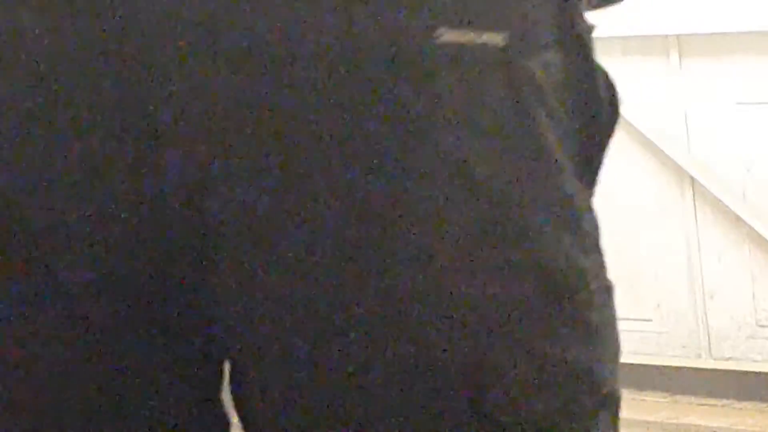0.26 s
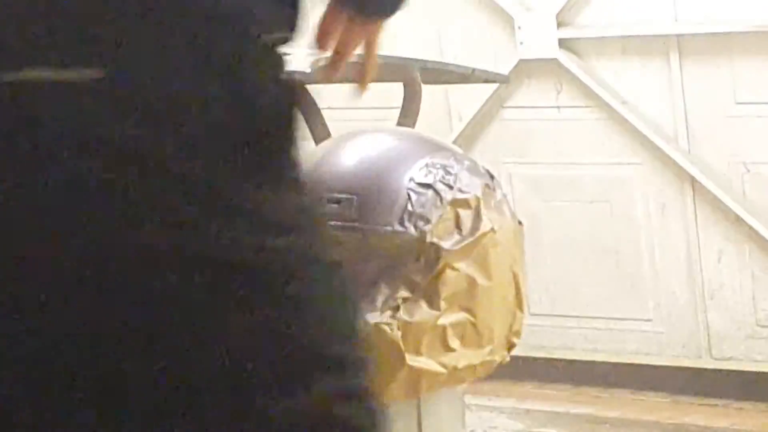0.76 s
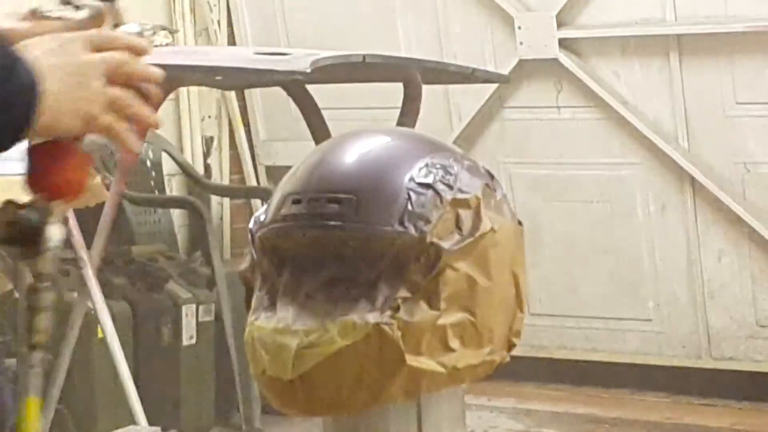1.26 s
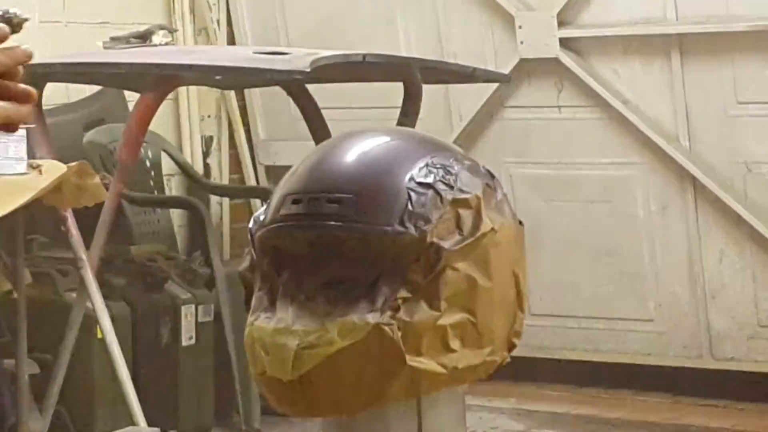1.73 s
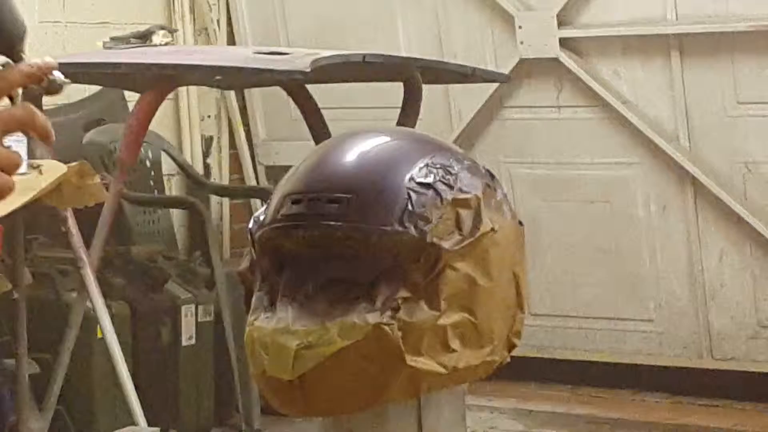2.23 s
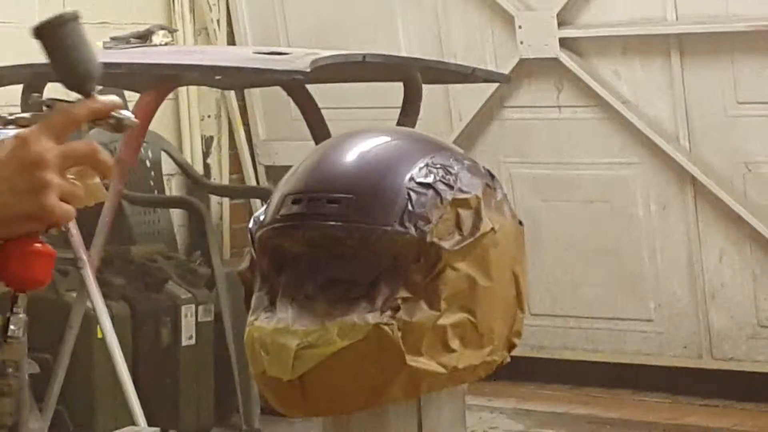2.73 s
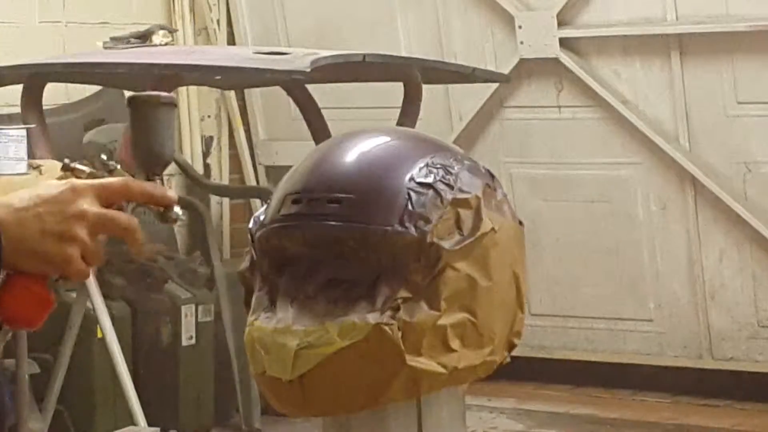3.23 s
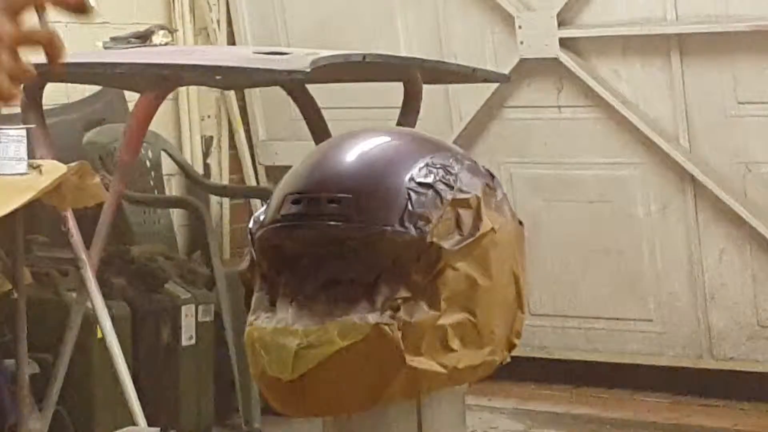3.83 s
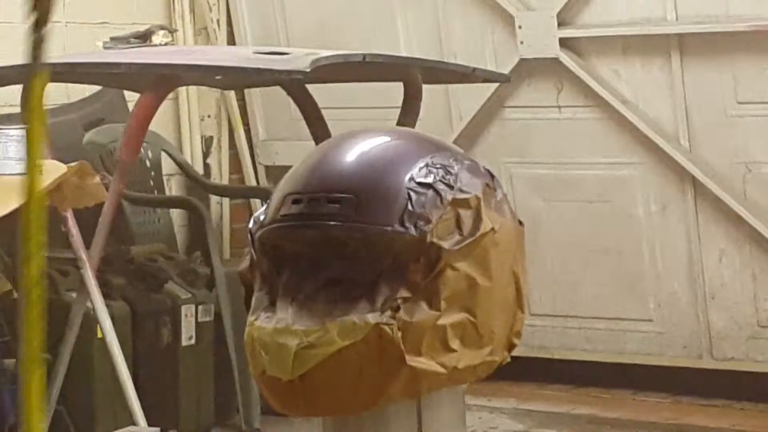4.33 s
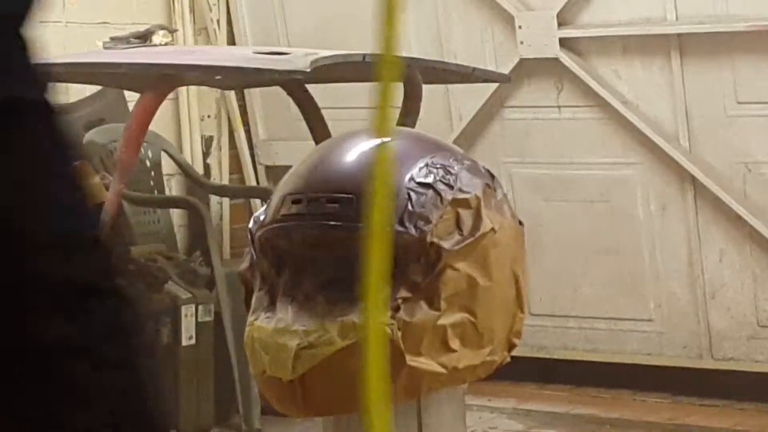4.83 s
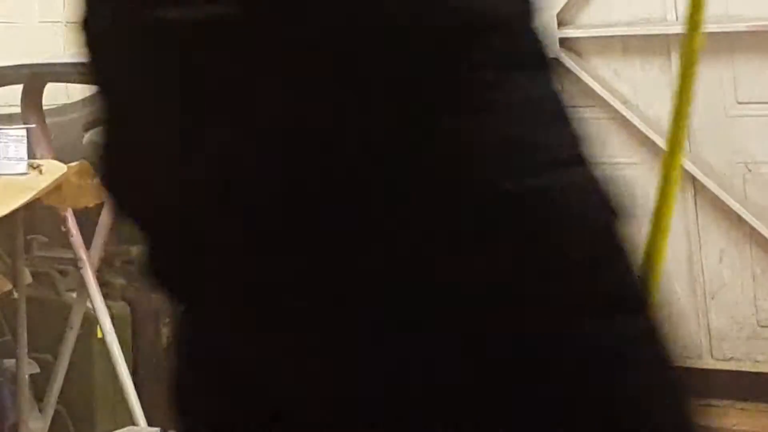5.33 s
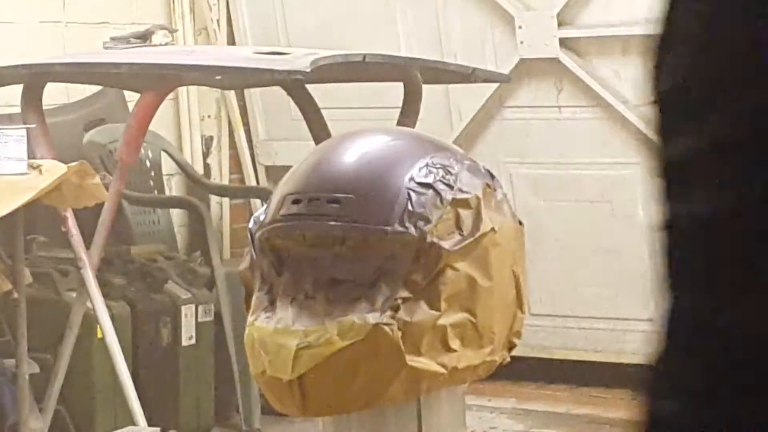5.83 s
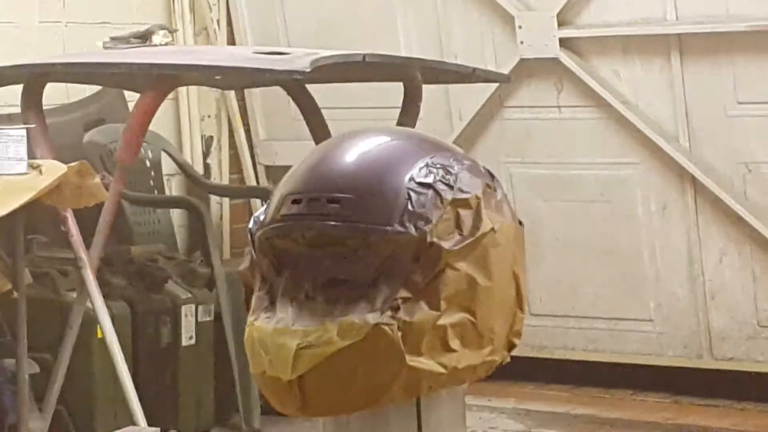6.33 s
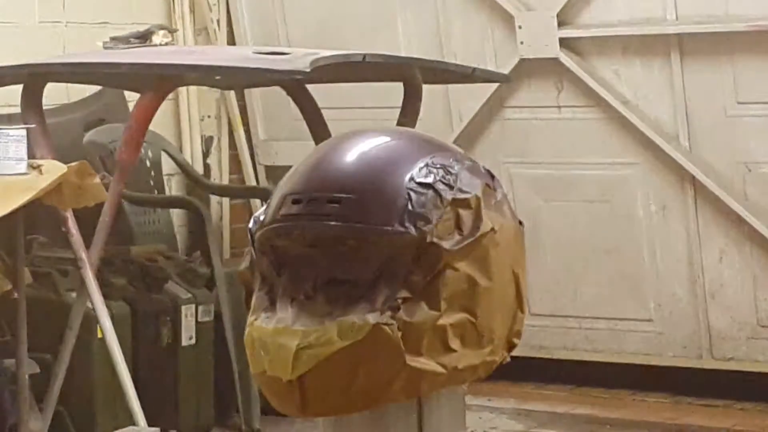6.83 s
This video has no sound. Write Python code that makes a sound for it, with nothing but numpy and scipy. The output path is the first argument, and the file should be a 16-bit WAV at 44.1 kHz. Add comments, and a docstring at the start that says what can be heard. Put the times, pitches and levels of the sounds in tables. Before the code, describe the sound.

In a reverberant garage, a piston air compressor drones loudly and close, then cuts out, its pitch sagging rapidly as a valve vents a bright puff of air. Two brief spray gun blasts follow. Air then leaks with a faint hiss and very high, unsteady whistles that slide and jump before dying away. A few tiny handling knocks are heard over a soft fan whirr and mains hum. Stereo microphones pick up the room.

```python
"""Compressor and leaking spray gun in a garage

A piston compressor pounds as pulses on its shaft's overtones, cuts out and stalls while its unloader
vents a jet of coloured noise. A spray gun gives two short noise bursts; then air leaks past its needle
as hiss and thin, wandering whistles (edge tones with unsteady pitch), with small knocks of handling.
Beneath lie a fan's whirr and steady rush, and the mains hum."""
import sys
import numpy as np
from scipy import signal
from scipy.fft import rfft, irfft, next_fast_len
from scipy.io import wavfile
from scipy.ndimage import uniform_filter1d, minimum_filter1d

SR = 44100
rng = np.random.default_rng(int(sys.argv[2]) if len(sys.argv) > 2 else 0)


def generate_wav(signal):
    """Clip the signal to [-1, 1] and save it as 16-bit WAV at the path in sys.argv[1]."""
    frames = np.transpose(np.atleast_2d(signal))
    scaled = np.clip(frames, -1, 1) * 32767
    pcm = np.round(scaled).astype(np.int16)
    wavfile.write(sys.argv[1], SR, pcm)


N = 311346
TIME = np.arange(N) / SR
PADDED = next_fast_len(N, real=True)
BINS = np.fft.rfftfreq(PADDED, 1 / SR)

# Colour tables give relative levels: the noise made from them is scaled to rms 1.
# one piston stroke's overtones: [multiple of shaft speed, relative level/dB]
STROKE_OVERTONES = [(1, -30.5), (2, -60), (3, -9), (4, -2), (5, 1.5), (6, -8), (7, -9.5), (8, -8), (9, -13),
                    (10, -4.5), (11, 1), (12, 1), (13, -18.5), (14, -17), (15, -11.5), (16, -6.5),
                    (17, -17), (18, -20), (19, -18), (20, -16), (21, -21.5), (22, -21), (23, -22),
                    (24, -27.5), (25, -22), (26, -31.5), (27, -18.5), (28, -18.5), (29, -45)]
# the casing's buzz above those overtones: [f/Hz, relative level/dB]
CASING_BUZZ = [(1460, -39.5), (1600, -28), (1680, -32), (1750, -23), (1850, -43), (2000, -28.5),
               (2070, -37), (2140, -27.5), (2300, -50), (2900, -44), (4000, -50)]
# air rushing through the intake and cooling fins: [f/Hz, density/dB per Hz]
INTAKE_COLOUR = [(40, -34), (100, -25), (190, -5), (400, -5.5), (650, -7), (950, -15), (1250, -18),
                 (1450, -19.5), (2100, -24), (3000, -24.5), (4000, -33), (6000, -32), (10000, -41),
                 (15500, -52.5)]
# the fan's air and overtones: [f/Hz, density/dB per Hz]
FAN_COLOUR = [(30, -38), (75, -11.5), (140, -7.5), (255, -0.5), (330, -5.5), (440, 2.5), (560, -0.5),
              (760, -10), (1270, -14), (1450, -20.5), (1700, -19.5), (2020, -16), (2350, -28), (2820, -33),
              (3400, -34.5), (6000, -38.5), (12000, -40)]
# the fan's rattling housing: [f/Hz, density/dB per Hz]
RATTLE_COLOUR = [(100, -30), (600, -6), (880, 0), (1050, -17.5), (1250, 14), (1500, -11.5), (2050, -4),
                 (2400, -8.5), (2750, -1), (3200, -27), (8000, -38)]
# faint high hisses of leaking air: [t/s, level/dB, width/s]
WISP_TIMES = [(1.32, -43, .05), (1.92, -44, 0.049)]
# the air of those hisses: [f/Hz, density/dB per Hz]
WISP_COLOUR = [(11500, -30), (13500, -10), (14600, 3), (15600, -6)]
# the unloader's jet: [f/Hz, density/dB per Hz]
VENT_COLOUR = [(40, -45), (90, -28), (200, -10.5), (600, 6), (1500, -2.5), (2200, -1.5), (2900, 4.5),
               (3700, 0), (5300, 2.5), (7500, 0), (10000, -4.5), (13000, -6.5), (15800, -12)]
# trigger pulls: [t/s, held/s, level/dB]
TRIGGER_PULLS = [(3.17, 0.17, -17), (3.459, 0.16, -17.5)]
# the gun nozzle's jet: [f/Hz, density/dB per Hz]
GUN_COLOUR = [(40, -52), (800, -13), (1500, -9.5), (2400, -6.5), (3100, -0.5), (3600, -6.5), (5000, -4),
              (7300, -2), (9200, -4.5), (12500, -0.5), (15800, 1.5)]
# the air blast striking the work: [f/Hz, density/dB per Hz]
BLAST_COLOUR = [(40, -50), (100, -13), (200, -10.5), (310, 2), (460, -5.5), (620, 0.5), (900, -14),
                (1250, -12.5), (1500, -28), (4000, -48)]
# the needle's shrill whistle holds a note, then leaps to the next:
# [t/s, first f/Hz, last f/Hz, bow/Hz, level before boost/dB, pitch jitter/Hz]
WHISTLE_NOTES = [(3.5, 15070, 14800, -50, -30, 18), (3.83, 14700, 15450, 100, -29, 55),
                 (3.939, 14940, 14490, -140, -26, 18), (4.43, 14430, 14040, 338, -25.5, 18),
                 (5.14, 14330, 14150, 276, -30.5, 64), (5.29, 13830, 14170, 40, -35, 22),
                 (5.5, 13880, 13680, 109, -42, 18), (5.93, 14580, 14830, 52, -45, 55),
                 (6.16, 14320, 14650, -59, -46, 85), (6.37, 13250, 13360, -60, -52, 93)]
# strength of the leak's hiss: [t/s, level/dB]
LEAK_LEVEL = [(3.6, -56), (3.9, -53.5), (4.6, -52.5), (4.8, -49.5), (5.14, -44.5), (5.28, -62.5),
              (6.2, -76), (7.06, -79)]
# the hiss of the leak: [f/Hz, density/dB per Hz]
LEAK_COLOUR = [(2500, -20), (4200, -10), (5250, 4), (6200, -2), (7300, -3), (8600, -4), (9400, 1),
               (10800, -8.5), (13000, -3), (15500, -10)]
# pitch guide of the hoarse whistle riding on the hiss: [t/s, f/Hz]
HOARSE_GUIDE = [(3.85, 5140), (4.398, 4840), (4.762, 5100), (5.172, 4980), (5.2, 4830)]
# small knocks and scuffs of handling: [t/s, level/dB, centre f/Hz, dying time/s]
HANDLING_KNOCKS = [(4.17, -52, 2700, 0.046), (4.927, -42, 2600, 0.01), (5.761, -33.5, 1780, 0.0095),
                   (5.81, -56, 2600, .06), (6.53, -58, 4010, .015)]
# faint side whistles as the leak dies:
# [t/s, length/s, first f/Hz, last f/Hz, bow/Hz, level/dB, octave level/dB, breath level/dB]
SIDE_NOTES = [(5.22, .73, 3830, 3900, 180, -74, 7, -13), (5.21, 0.93, 12400, 12900, -3000, -61.5, -60, -10),
              (5.93, .42, 3860, 3690, -11, -80.5, 12, -12), (6.70, .26, 4540, 4380, -190, -59, -10, 3)]
# a faint short hiss near the end: [t/s, level/dB, dying time/s]
LATE_HISS = (6.98, -50.5, .15)
# the colour of that hiss: [f/Hz, density/dB per Hz]
LATE_HISS_COLOUR = [(3500, -24), (5300, -3), (6800, -13), (10700, 2), (13000, -8), (15500, -4)]
# decay of the garage's tail: [f/Hz, t60/s]
ROOM_DECAY = [(100, 0.12), (500, 0.75), (3000, 0.87), (8000, 0.56), (15000, 0.3)]
# left-right likeness of the sound: [f/Hz, correlation]
LIKENESS = [(200, 1.0), (600, .99), (1000, 0.87), (1500, 0.55), (2500, 0.88), (5000, 0.73), (9000, 0.72),
            (14000, 0.82)]
# difference between the microphones: [f/Hz, left minus right/dB]
MIC_BALANCE = [(380, 0.5), (700, -1), (1290, -1), (2400, 0.5), (4400, -1), (8100, 2), (15000, 2)]

PUMP_HZ, FAN_HZ = 48.68, 36.15  # running speeds in shaft turns per s
# the pump's level climbs as the tank fills
PUMP_DB, FILLING_DB_PER_S = -10.5, 0.35
# the slipping motor beats slowly against the mains
BEAT_HZ, BEAT_CREST_S, BEAT_DB = 2.53, 0.15, 0.44
# motor cut-out; time constants of the shaft's slowing and of the strokes' weakening
CUT_S, COAST_S, STALL_S = 2.70, .2, 0.17
# below 1, the shaft loses its speed fastest at first, against the full head of air
COAST_SHAPE = .72
MAINS_HZ, MAINS_DB = 100.5, -43.5
FAN_RATTLE_DB = -54
# the unloader valve opens, then blows hardest, at this level
VENT_OPEN_S, VENT_FULL_S, VENT_DB = 2.675, 2.806, -15
NEEDLE_END_S = 6.5
WIDE_FROM_S, WIDE_UNTIL_S = 3.8, 5.21  # the leak is wide open between these times
EDGE_HZ = 15850  # top of the band


def gain_of(db):
    """Turns decibels into amplitude."""
    return 10 ** (np.asarray(db) / 20)


def evened(x):
    """Scales a signal to rms 1 over its whole length."""
    return x / np.sqrt(np.mean(x ** 2) + 1e-20)


def read(points, hz):
    """Reads a table against a log-frequency axis."""
    f, value = np.transpose(points)
    return np.interp(np.log(hz + 1), np.log(f + 1), value)


def level(rows):
    """Draws a level curve as a gain, silent beyond 40 ms outside its span."""
    s, db = np.transpose(rows)
    inside = (TIME > s[0] - .04) * (TIME < s[-1] + .04)
    return gain_of(np.interp(TIME, s, db)) * inside


def held(start, end, ramp_s):
    """Opens a gate with ramps just after start and just before end."""
    return np.clip(np.minimum(TIME - start, end - TIME) / ramp_s, 0, 1)


def low_passed(x, hz):
    """Rolls off the treble smoothly above hz, without delay."""
    return irfft(rfft(x, PADDED) / (1 + (BINS / hz) ** 4), PADDED)[..., :N]


def wander(rate_hz):
    """Drifts at random up to about rate_hz, with rms 1."""
    return evened(low_passed(rng.standard_normal(PADDED), rate_hz))


def air(spectrum):
    """Makes turbulent noise of a given colour, partly alike at the two microphones."""
    common, apart = rfft(rng.standard_normal((2, PADDED)))
    same = np.clip(read(LIKENESS, BINS), -1, 1)
    mid, side = common * np.sqrt(1 + same), apart * np.sqrt(1 - same)
    coloured = np.array([mid + side, mid - side]) * gain_of(read(spectrum, BINS))
    return evened(irfft(coloured, PADDED)[:, :N])


def garage(x):
    """Convolves with a diffuse half-second tail, each band dying at its own speed."""
    noise = air([(20, 0), (20000, 0)])[:, :SR // 2]
    hz, t, z = signal.stft(noise, SR, nperseg=256)
    decay = gain_of(-60 * t / read(ROOM_DECAY, hz)[:, None])
    tail = signal.istft(z * decay, SR, nperseg=256)[1]
    tail = tail / np.linalg.norm(tail[0])
    return signal.fftconvolve(np.atleast_2d(x), tail, axes=1)[:, :N]


def echoing(tone, wet):
    """Mixes a tone with its echoes, which make it flutter; wet is their share of the power."""
    return np.sqrt(1 - wet) * tone + np.sqrt(wet) * garage(tone)


def overtones(shaft_hz, turns, size, lag, flutter):
    """Stacks multiples of a shaft's speed, the high ones fluttering more and spread in stereo."""
    unrest = [wander(3.7) + 1j * wander(8.5) for _ in range(5)]
    hz = shaft_hz * np.arange(1, len(size) + 1)
    spread = np.arccos(np.clip(read(LIKENESS, hz), -1, 1)) / 2
    step, spin = np.exp(2j * np.pi * turns), np.ones(N, complex)
    mid, side = np.zeros((2, N))
    for k, amplitude in enumerate(size):
        spin = spin * step  # one multiple higher
        unsteady = 1 + flutter * (k + 1) * unrest[k % len(unrest)]
        partial = amplitude * np.exp(1j * lag[k]) * spin * unsteady
        mid += np.cos(spread[k]) * partial.real
        side += (-1) ** k * np.sin(spread[k]) * partial.imag
    return evened(np.array([mid + side, mid - side]))


def glide(start, length, first_hz, last_hz, bow_hz, flatness):
    """Slides a note from first to last pitch, bowed in the middle (flatness 2 is a parabola)."""
    u = np.clip((TIME - start) / length, 0, 1)
    return first_hz + (last_hz - first_hz) * u + bow_hz * (1 - abs(2 * u - 1) ** flatness)


def whistle(pitch, loudness, jitter_hz, breath_db, breath_hz, partials):
    """Sounds an edge tone with unsteady pitch and a noisy skirt; partials are (multiple, dB)."""
    turns = np.cumsum(pitch + jitter_hz * wander(61.5)) / SR
    tone = np.zeros(N)
    for multiple, partial_db in partials:
        skirt = gain_of(breath_db) * (wander(breath_hz) + 1j * wander(breath_hz)) / np.sqrt(2)
        partial = (1 + skirt) * np.exp(2j * np.pi * multiple * turns)
        tone += gain_of(partial_db) * partial.real
    return tone * np.sqrt(2 / (1 + gain_of(breath_db) ** 2)) * loudness


def compressor(scatter=0.74, intake_db=-13.0, throb=0.04, ring_s=0.066, stall_db=-11.5,
               stall_room_db=-3, tank_hz=160, waver_db=0.33, flutter=.0095):
    """One pulse a turn rings tank and casing; all its overtones sink together as the shaft stalls."""
    since_cut = np.maximum(TIME - CUT_S, 0)
    speed = PUMP_HZ * np.exp(-(since_cut / COAST_S) ** COAST_SHAPE)
    beat = BEAT_DB * np.cos(2 * np.pi * BEAT_HZ * (TIME - BEAT_CREST_S))
    effort_db = PUMP_DB + FILLING_DB_PER_S * TIME + beat + waver_db * wander(16)
    effort = gain_of(effort_db) * np.exp(-np.minimum(since_cut / STALL_S, 10) ** 2)

    stroke_db = np.transpose(STROKE_OVERTONES)[1]
    upper = np.arange(len(stroke_db) + 1, 3 * len(stroke_db))
    buzz_db = read(CASING_BUZZ, upper * PUMP_HZ) + 1.5 * rng.standard_normal(len(upper))
    size = gain_of(np.r_[stroke_db, buzz_db])
    # a causal ring follows each stroke; random phase scatter softens the pulse
    mirrored = np.log(np.r_[size[0], size, size[::-1]])
    lag = -signal.hilbert(mirrored).imag[1:len(size) + 1]
    lag += scatter * rng.standard_normal(len(size))

    # the steady drone hangs in the room for a moment after the motor cuts out
    drone_turns = np.cumsum(PUMP_HZ * (1 + 0.00065 * wander(6.7))) / SR
    drone = overtones(PUMP_HZ, drone_turns, size, lag, flutter) * np.exp(-since_cut / ring_s)
    # the last, slowing strokes: the tank radiates little bass, and echoes blur the falling lines
    turns = np.cumsum(speed) / SR
    stall = overtones(PUMP_HZ, turns, size, lag, flutter)
    stall = stall * (1 - np.exp(-since_cut / 0.016)) * effort
    bass_cut = signal.butter(N=4, Wn=tank_hz, btype="high", fs=SR, output="sos")
    stall = signal.sosfilt(bass_cut, stall)
    gulps = evened(air(INTAKE_COLOUR) * (1 + throb * np.cos(2 * np.pi * (turns - .25))))
    running = effort * (drone + gain_of(intake_db) * gulps)
    return running + gain_of(stall_db) * stall + gain_of(stall_room_db) * garage(stall)


def fan(rush_db=-40, whirr_db=-41, throb=0.06, scatter=1.61, flutter=0.015):
    """Mains hum, a whirr on the shaft's overtones, and rushing air that throbs once a turn."""
    turns = np.cumsum(FAN_HZ * (1 + 0.001495 * wander(1.96))) / SR
    hz = FAN_HZ * np.arange(1, 85)
    size = gain_of(read(FAN_COLOUR, hz) + 2 * rng.standard_normal(len(hz)))
    lag = np.cumsum(scatter * rng.standard_normal(len(hz)))
    whirr = overtones(FAN_HZ, turns, size, lag, flutter)
    rush = evened(air(FAN_COLOUR) * (1 + throb * np.cos(2 * np.pi * turns)))
    hum = np.sqrt(2) * np.sin(2 * np.pi * MAINS_HZ * TIME) * gain_of(.9 * wander(4))
    # the housing rattles afresh on every turn, dying over 0.41 of a turn
    rattle = evened(air(RATTLE_COLOUR) * np.exp(-(turns % 1) / 0.41))
    steady = gain_of(MAINS_DB) * hum + gain_of(whirr_db) * whirr + gain_of(FAN_RATTLE_DB) * rattle
    return steady + gain_of(rush_db + .5 * wander(2.6)) * rush


def wisps():
    """Two faint high hisses of leaking air swell and fade."""
    flow = np.zeros(N)
    for s, db, width in WISP_TIMES:
        flow += gain_of(db) * np.exp(-((TIME - s) / width) ** 2)
    return air(WISP_COLOUR) * flow


def unloader(opening_s=0.012, swell_db_per_s=46, emptying_s=.27, emptying_shape=1.9,
             dull_hz=9500, dulling=0.47):
    """The valve snaps open, swells and empties the pump head; the jet dulls as its pressure falls."""
    swell = gain_of(VENT_DB - swell_db_per_s * np.maximum(VENT_FULL_S - TIME, 0))
    pressure = np.exp(-(np.maximum(TIME - VENT_FULL_S, 0) / emptying_s) ** emptying_shape)
    flow = np.clip((TIME - VENT_OPEN_S) / opening_s, 0, 1) * swell * pressure
    jet = air(VENT_COLOUR)
    body = low_passed(jet, dull_hz)
    dulled = body + (jet - body) * pressure ** dulling
    return dulled * flow * gain_of(0.57 * wander(60))


def spray_gun(opening_s=0.0087, closing_s=0.078, blast_db=-8.5, blast_lag_s=0.019):
    """The jet opens at once and fades on release; the low blast on the work builds a little later."""
    flow = np.zeros(N)
    for s, held_s, db in TRIGGER_PULLS:
        opening = np.clip((TIME - s) / opening_s, 0, 1)
        flow += gain_of(db) * opening * np.exp(-np.maximum(TIME - s - held_s, 0) / closing_s)
    keep = np.exp(-1 / (blast_lag_s * SR))
    push = flow ** 2 / flow.max()  # the blast grows with the square of the flow
    blast = signal.lfilter([1 - keep], [1, -keep], push) * gain_of(blast_db + 1.85 * wander(18))
    return air(GUN_COLOUR) * flow * gain_of(0.36 * wander(60)) + air(BLAST_COLOUR) * blast


def needle(boost_db=3.5, undertone_db=-34):
    """A shrill whistle leaps between notes; a tone at 2/3 its pitch follows while the leak is wide."""
    pitch, jitter, loudness = np.zeros((3, N))
    ends = [row[0] for row in WHISTLE_NOTES[1:]] + [NEEDLE_END_S]
    for (s, first_hz, last_hz, bow_hz, db, jitter_hz), end in zip(WHISTLE_NOTES, ends):
        note = glide(s, end - s, first_hz, last_hz, bow_hz, flatness=1.97)
        pitch = np.where(TIME >= s, note, pitch)
        jitter = np.where(TIME >= s, jitter_hz, jitter)
        loudness += gain_of(db) * held(s, end, ramp_s=0.0057)
    shrill = whistle(pitch, loudness, jitter, breath_db=-22, breath_hz=320, partials=[(1, 0)])
    under_loudness = loudness * held(WIDE_FROM_S, WIDE_UNTIL_S, ramp_s=.05)
    under = whistle(pitch * 2 / 3, under_loudness, jitter_hz=60, breath_db=3, breath_hz=150,
                    partials=[(1, undertone_db)])
    return echoing(gain_of(boost_db) * shrill + under, wet=0.72)


def leak(hoarse_db=-6.5, breathy_hz=7300, breathy_db=-53):
    """Air escapes past the needle as a hiss with a hoarse and a breathy edge tone."""
    flow = level(LEAK_LEVEL)
    hoarse_pitch = np.interp(TIME, *np.transpose(HOARSE_GUIDE))
    hoarse_loudness = flow * held(WIDE_FROM_S, WIDE_UNTIL_S, ramp_s=.05)
    # the hoarse tone sounds a touch below its guide
    hoarse = whistle(hoarse_pitch, hoarse_loudness, jitter_hz=45.3, breath_db=0, breath_hz=130,
                     partials=[(0.98, hoarse_db)])
    breathy = whistle(breathy_hz, held(3.93, WIDE_UNTIL_S, ramp_s=0.18), jitter_hz=120,
                      breath_db=12, breath_hz=450, partials=[(1, breathy_db)])
    hiss = air(LEAK_COLOUR) * flow * gain_of(0.72 * wander(12))
    return echoing(hoarse, wet=.4) + echoing(breathy, wet=0.89) + hiss


def handling(room_db=-4):
    """Short dull knocks and scuffs, bursts of banded noise, as the gun and hose are moved."""
    out = np.zeros((2, N))
    for s, db, hz, dying in HANDLING_KNOCKS:
        age = np.maximum(TIME - s, 0)
        colour = [(hz / 8, -10), (hz / 2, -2), (hz, 0), (hz * 1.5, -4), (hz * 2, -16), (hz * 6, -42)]
        out += gain_of(db) * air(colour) * np.minimum(age / 0.0019, 1) * np.exp(-age / dying)
    return out + gain_of(room_db) * garage(out)


def side_whistles(flatness=2.9, drift=.004):
    """Thin edge tones slide about as the leak dies away."""
    tones = np.zeros(N)
    for s, length, first_hz, last_hz, bow_hz, db, octave_db, breath_db in SIDE_NOTES:
        loudness = gain_of(db) * held(s, s + length, ramp_s=0.018)
        pitch = glide(s, length, first_hz, last_hz, bow_hz, flatness) * (1 + drift * wander(7))
        tones += whistle(pitch, loudness, jitter_hz=.005 * first_hz, breath_db=breath_db,
                         breath_hz=140, partials=[(1, 0), (2, octave_db)])
    return echoing(tones, wet=.52)


def late_hiss():
    """A faint short hiss near the end, coloured noise opening quickly and dying away."""
    s, db, dying = LATE_HISS
    opening = np.clip((TIME - s) / 0.018, 0, 1)
    fade = np.exp(-np.maximum(TIME - s, 0) / dying)
    return air(LATE_HISS_COLOUR) * gain_of(db) * opening * fade


def scene():
    """Sums all sources in the garage."""
    machines = compressor() + fan() + unloader()
    gun = wisps() + spray_gun() + needle() + leak() + handling() + side_whistles()
    return machines + gun + late_hiss()


def record(dry):
    """Adds the two microphones' colour, a quick limiter on the peaks, then the band limit."""
    dry = dry * np.minimum(TIME / .004, 1)  # short fade-in
    tilt = gain_of(read(MIC_BALANCE, BINS) * [[.5], [-.5]])
    heard = irfft(rfft(dry, PADDED) * tilt, PADDED)[:, :N]
    headroom = minimum_filter1d(1 / np.maximum(abs(heard).max(0), 1), size=441)
    limited = heard * uniform_filter1d(uniform_filter1d(headroom, size=221), size=221)
    band = signal.firwin(511, EDGE_HZ, window=("kaiser", 9), fs=SR)
    return signal.oaconvolve(limited, band[None], "same")


dry = scene()
out = record(dry)
generate_wav(out)
```